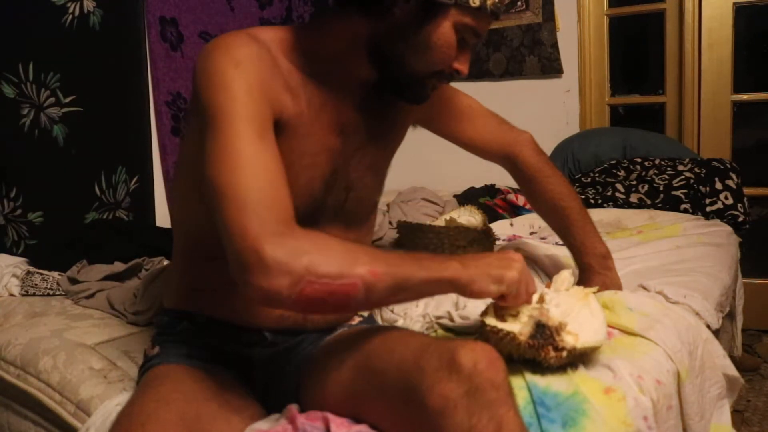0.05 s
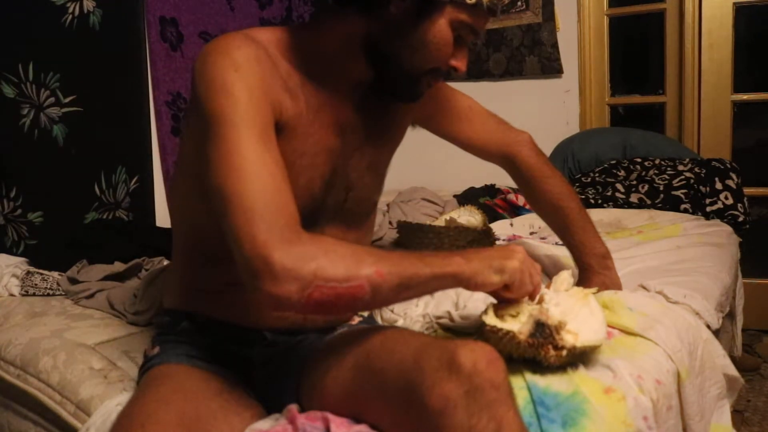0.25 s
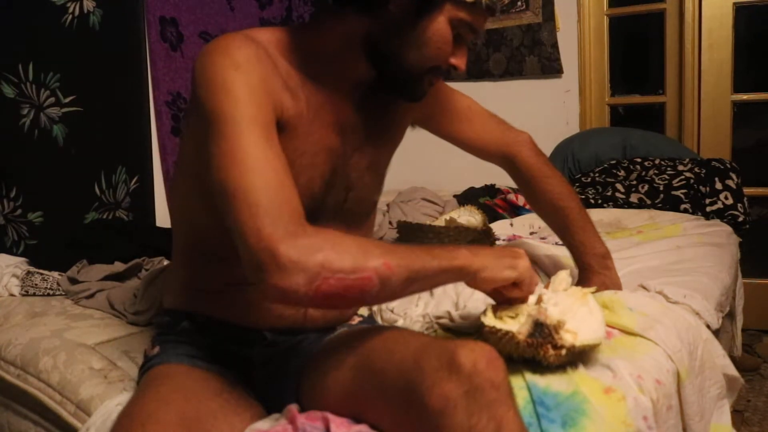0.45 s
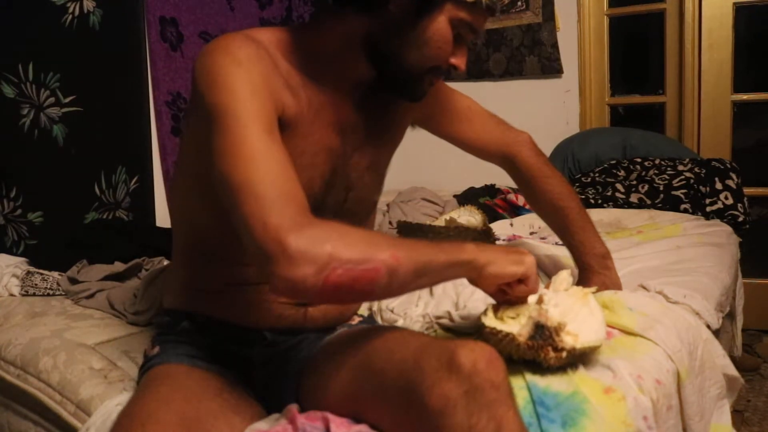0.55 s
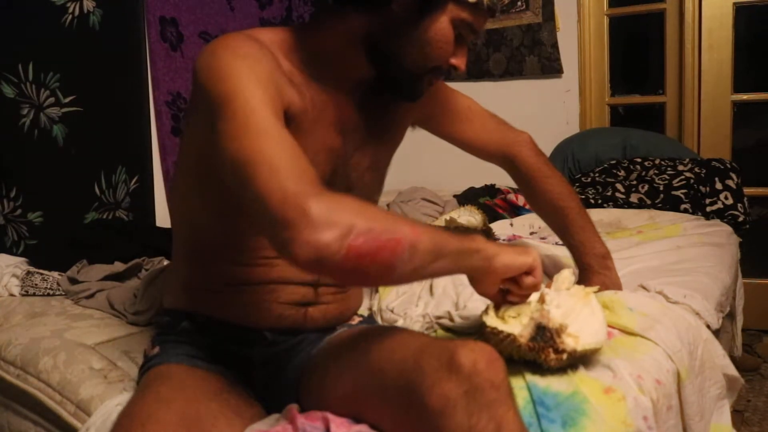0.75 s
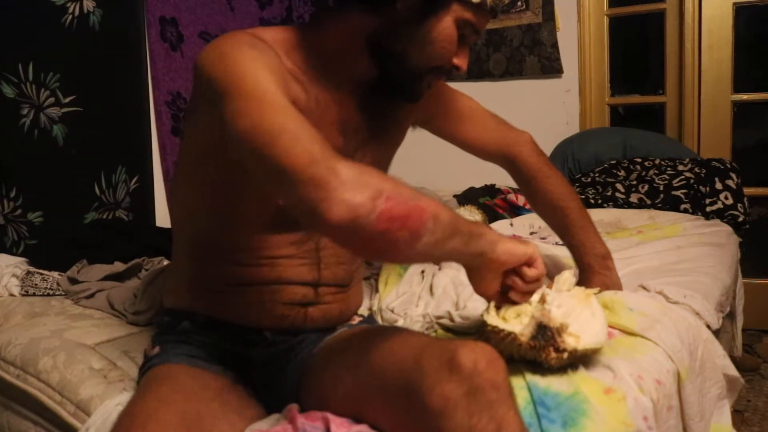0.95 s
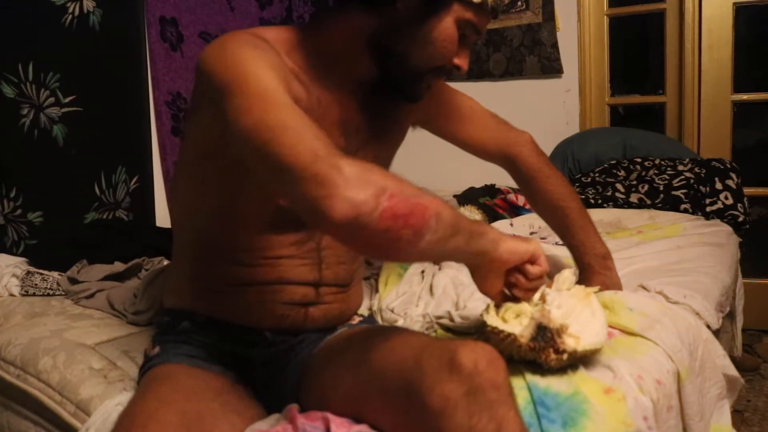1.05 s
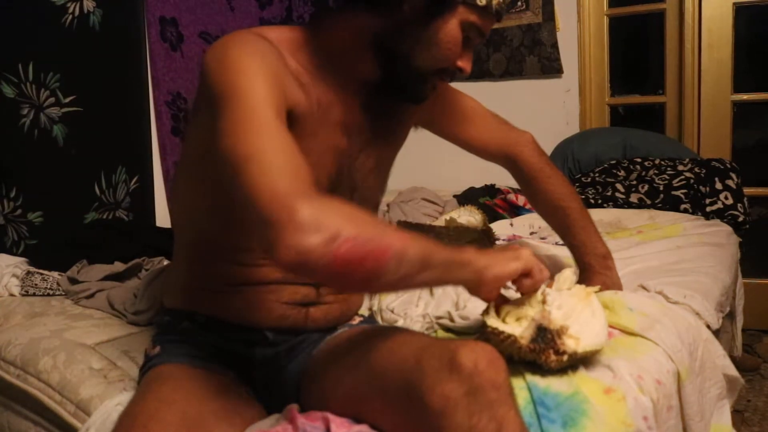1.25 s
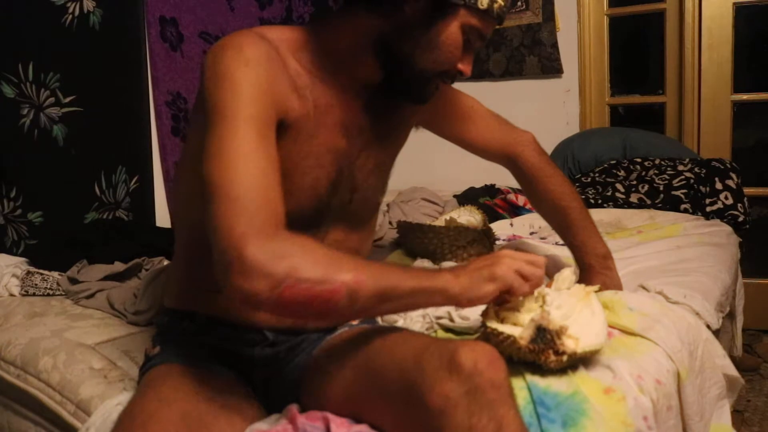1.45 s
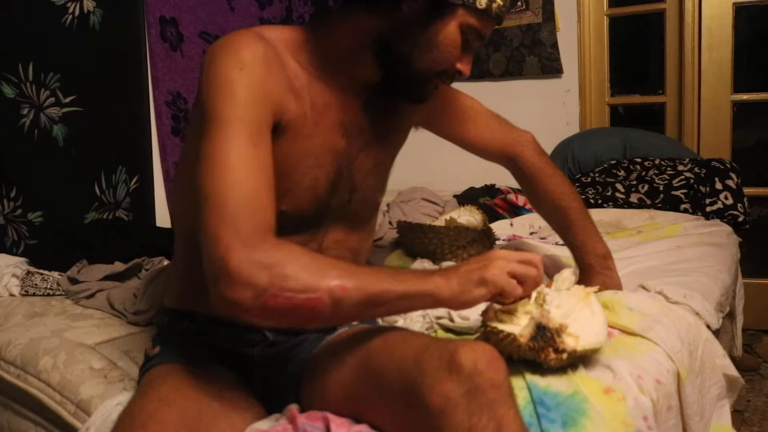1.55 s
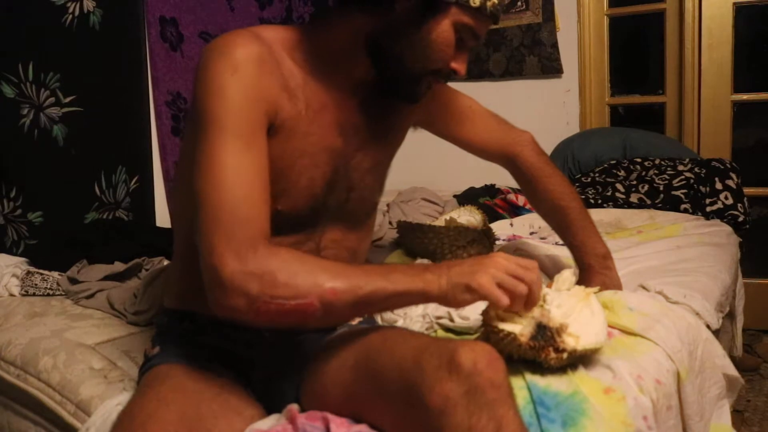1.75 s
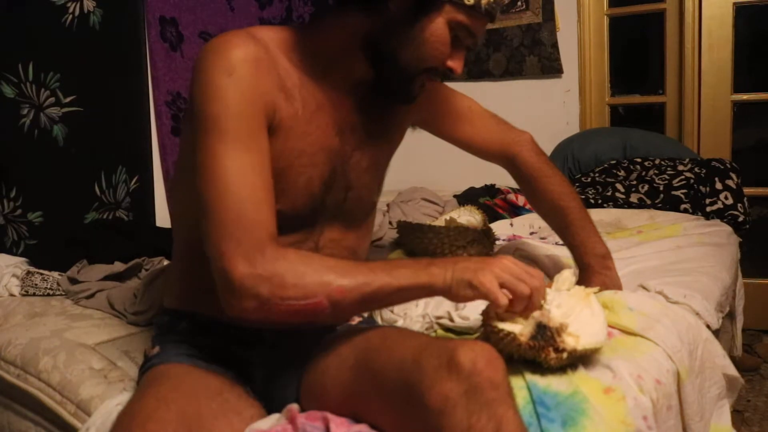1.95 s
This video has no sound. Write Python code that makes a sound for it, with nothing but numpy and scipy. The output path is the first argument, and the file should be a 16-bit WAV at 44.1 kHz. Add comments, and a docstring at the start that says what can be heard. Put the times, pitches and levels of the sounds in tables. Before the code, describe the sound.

Small frogs whistle repeatedly outside at night over steady crickets, with a few faint ticks.

```python
"""A garden at night, heard from inside a bedroom. From the start, over soft air noise, crickets trill
near 6 kHz under a high, raspy buzz, and distant coqui frogs blend into a reverberant chorus.
Nearer frogs open with a low, almost level "co"; rising "qui" whistles join at 0.2 s, each note smeared
by reflections from walls and trees. From 1.2 s on, fingers picking at a fruit snap its fibres
in a few faint ticks."""
import sys
import numpy as np
from scipy import signal
from scipy.fft import rfft, irfft
from scipy.io import wavfile

SR = 44100
rng = np.random.default_rng(int(sys.argv[2]) if len(sys.argv) > 2 else 0)


def bounce(signal):
    """Save signal as a 16-bit WAV file at the path given by the first command-line argument."""
    frames = np.transpose(np.atleast_2d(signal))
    limited = np.clip(frames, -1, 1)
    pcm = np.round(limited * 32767).astype(np.int16)
    wavfile.write(sys.argv[1], SR, pcm)


N = 88200
BAND_LIMIT_HZ = 14800


def amp(db):
    """The decibel scale: 20 dB is a factor of ten in amplitude."""
    return 10 ** (np.asarray(db) / 20)


def unit(x):
    """Normalisation to rms 1."""
    return x / np.sqrt(np.mean(x ** 2) + 1e-20)


def pan(db):
    """Constant-power panning: two gains, the left exceeding the right by db."""
    return unit(amp([[db / 2], [-db / 2]]))


def add(mix, start_s, sound):
    """Superposition: a stereo sound adds to the mix from start_s on."""
    part = mix[:, max(round(start_s * SR), 0):][:, :sound.shape[1]]
    part += sound[:, :part.shape[1]]


def colour(x, spectrum):
    """Spectral shaping: gains interpolated over log frequency, the result at rms 1."""
    points_hz, points_db = np.transpose(spectrum)
    hz = np.fft.rfftfreq(x.shape[-1], 1 / SR)
    gain_db = np.interp(np.log(hz + 1), np.log(points_hz), points_db, -100, -100)
    return unit(irfft(rfft(x) * amp(gain_db), x.shape[-1]))


def drift(rate_hz):
    """Low-pass noise: a smooth random fluctuation of rms 1."""
    hz = np.fft.rfftfreq(N, 1 / SR)
    return unit(irfft(rfft(rng.standard_normal(N)) * np.exp(-(hz / rate_hz) ** 2), N))


# Spectral density of night air and room tone: frequency_hz, relative_db
AIR_SPECTRUM = [(20, -15), (45, -7.5), (80, -2), (180, 0.5), (450, -0.5), (1000, -5), (2100, -6),
                (4300, -10), (7500, -13), (12000, -15.5), (15000, -28.5)]


def air(level_db=-53, shared_power=0.14):
    """A diffuse field: the noise at left and right is only weakly correlated."""
    left, right, shared = rng.standard_normal((3, N))
    noise = np.array([left, right]) + np.sqrt(shared_power) * shared
    return amp(level_db) * colour(noise, AIR_SPECTRUM)


# Spectral density of the massed crickets: frequency_hz, relative_db
CRICKET_SPECTRUM = [(5200, -27), (5550, -17), (5800, -6), (6020, -0.5), (6130, 1), (6270, -4.5),
                    (6420, -25), (6700, -53)]


def crickets(level_db=-50.5, pulse_hz=44, depth=0.35):
    """Amplitude modulation: trills merge into narrow-band noise, and the nearest throbs through."""
    phase = 2 * np.pi * np.cumsum(pulse_hz * (1 + 0.019 * drift(rate_hz=4.5))) / SR
    throb = np.exp(depth * (np.cos(phase) + 0.46 * np.cos(2 * phase)) / 2)
    trills = colour(rng.standard_normal((2, N)), CRICKET_SPECTRUM)
    return amp(level_db) * pan(db=-5.5) * unit(trills * throb)


# Spectral envelope of the high, raspy buzz: frequency_hz, relative_db
BUZZ_SPECTRUM = [(7500, -44), (8900, -18), (9800, -7), (10400, -2.5), (10950, -1), (11700, -10.5),
                 (12600, -14), (13600, -20), (14600, -30)]


def high_buzz(rate_hz=172.27, half_width_hz=7, decay_s=0.0011, rasp_db=-48.5, hiss_db=-52):
    """Roughness from fast modulation: a high, raspy buzz near 11 kHz, pulsing 172 times a second."""
    t, hz = np.arange(N) / SR, np.fft.rfftfreq(N, 1 / SR)
    harmonic = np.round(hz / rate_hz).astype(int)
    emphasis = amp(3.5 * (harmonic % 3 == 0))  # every third partial stands out
    comb = emphasis / np.hypot(1, (hz - harmonic * rate_hz) / half_width_hz)
    side_phasors = np.exp(2j * np.pi * rng.random((2, harmonic.max() + 1)))[:, harmonic]
    flutter_phasors = np.exp(2j * np.pi * rng.random(len(hz)))
    rasp = colour(irfft(comb * side_phasors * flutter_phasors, N), BUZZ_SPECTRUM)
    hiss = colour(rng.standard_normal((2, N)), BUZZ_SPECTRUM)
    throb = unit(1 + 0.63 * np.exp(-(t % (1 / rate_hz)) / decay_s))
    return (amp(rasp_db) * rasp + amp(hiss_db) * hiss) * throb


def echoes(x, echo_db, gap_s=0.0044, reflections_per_s=2000, garden_t60_s=0.57, left_lag_s=0.00011):
    """Reverberation: direct sound, quick wall reflections and a garden tail, at unchanged energy."""
    t = np.arange(SR) / SR
    reflections = rng.standard_normal((2, SR)) * (rng.random((2, SR)) < reflections_per_s / SR)
    wall_t60_s = max(0.25 + 0.0243 * echo_db, 0.05)  # the farther the frog, the longer its echoes
    decay = np.hypot(amp(-60 * t / wall_t60_s), amp(-20 - 60 * t / garden_t60_s))
    wet = signal.fftconvolve(x[None], reflections * (t > gap_s) * decay, axes=1)
    right = np.pad(x, (0, SR - 1))
    direct = np.array([np.roll(right, round(left_lag_s * SR)), right])
    out = direct + amp(echo_db) * wet * np.linalg.norm(x) / np.linalg.norm(wet, axis=1, keepdims=True)
    return out * np.linalg.norm(x) / np.linalg.norm(out, axis=1, keepdims=True)


def far_frogs(note, pitch_hz, level_db, notes_per_s):
    """Beyond the critical distance, echo outweighs direct sound and many calls blur into a chorus."""
    out = np.zeros((2, N + SR))  # the chorus is under way a second before the scene
    count = round(notes_per_s * (N / SR + 1))
    for k, (delay, detune) in enumerate(rng.random((count, 2))):
        call = note(pitch_hz * (1 + 0.12 * (detune - 0.5)))
        add(out, (k + delay) / notes_per_s, echoes(call, echo_db=13))
    return amp(level_db) * pan(db=-7) * unit(out[:, SR:])


def whistle_phase(hz, waver=0.0013):
    """Phase is the integral of frequency, which here wavers by a small random fraction."""
    return 2 * np.pi * np.cumsum(hz * (1 + waver * drift(rate_hz=100)[:len(hz)])) / SR


def gate(t, attack_s, release_s):
    """A raised-cosine envelope: soft attack, hold and soft release."""
    ramp = np.clip(np.minimum(t / attack_s, (t[-1] - t) / release_s), 0, 1)
    return np.sin(np.pi / 2 * ramp) ** 2


def co(length_s, pitch_hz, octave_db, sag_hz_per_s=290):
    """A nearly pure tone with a weak second harmonic, sagging slightly in pitch."""
    t = np.arange(0, length_s, 1 / SR)
    phase = whistle_phase(pitch_hz - sag_hz_per_s * (t - length_s / 2))
    tone = np.sin(phase) + amp(octave_db) * np.sin(2 * phase)
    return unit(gate(t, attack_s=0.0087, release_s=0.017) * tone)


# Low frog notes, and a short echo of one at 0.985 s:
# start_s, length_s, pitch_hz, level_db, pan_db, echo_db, octave_db
CO_TONES = [(0.0, 0.032, 1580, -48, 3, -3, -30), (0.041, 0.048, 1576, -44.5, -13, -4.5, -25),
            (0.136, 0.06, 1546, -47.5, -8, 14, -27), (0.191, 0.081, 1690, -35.5, -4.5, -1, -12.5),
            (.508, 0.089, 1516, -45.5, -6, 0.5, -30), (0.863, 0.094, 1554, -42.5, -8.5, -2, -23),
            (0.985, 0.036, 1555, -49.5, -1, -3, -30), (1.421, 0.086, 1519, -37.5, -9.5, -5, -36),
            (1.795, 0.047, 1528, -49.5, -1, -3, -30), (1.921, 0.075, 1603, -54, -15, 5, -30)]


def near_co_tones():
    """Multipath propagation: each low tone reaches the room by its own set of reflections."""
    out = np.zeros((2, N))
    for start_s, length_s, pitch_hz, level_db, pan_db, echo_db, octave_db in CO_TONES:
        tone = co(length_s, pitch_hz, octave_db)
        add(out, start_s, amp(level_db) * pan(pan_db) * echoes(tone, echo_db))
    return out


def qui(length_s, first_hz, top_hz, swell_db=6.5):
    """A frequency sweep: the whistle swells as it climbs and levels off at the top."""
    t = np.arange(0, length_s, 1 / SR)
    climb = 1 - np.abs(1 - t / length_s) ** 1.45
    tone = np.sin(whistle_phase(first_hz + (top_hz - first_hz) * climb))
    return unit(gate(t, attack_s=0.006, release_s=0.013) * amp(swell_db * climb) * tone)


# Rising notes of the near frogs: start_s, length_s, first_hz, top_hz, level_db, pan_db, echo_db
QUI_CALLS = [(0.191, 0.099, 2468, 3015, -39, -3, 13.5), (0.368, 0.085, 2360, 2870, -44.5, -7, 8.5),
             (0.418, .105, 2557, 3101, -21.5, -7.5, -1.5), (0.73, .1, 2280, 2800, -42, -5.5, 11.5),
             (0.874, 0.097, 2890, 3154, -59.5, -4.5, -5), (1.068, .1, 2438, 2916, -37, -3, 21),
             (1.482, 0.056, 2583, 2868, -49.5, -10, 19), (1.598, 0.09, 2605, 3036, -50, -6, 17),
             (1.637, .11, 2282, 2690, -37.5, -8.5, 3.5), (1.955, 0.084, 2506, 2895, -50, -10, 11)]


def near_qui_calls():
    """Interference: each rising note overlaps its own delayed reflections and is smeared."""
    out = np.zeros((2, N))
    for start_s, length_s, first_hz, top_hz, level_db, pan_db, echo_db in QUI_CALLS:
        call = qui(length_s, first_hz, top_hz)
        add(out, start_s, amp(level_db) * pan(pan_db) * echoes(call, echo_db))
    return out


# Fruit fibres snapping under the fingers: start_s, peak_db, pitch_hz, pan_db
FIBRE_SNAPS = [(1.23, -36, 3900, -5), (1.375, -42, 4800, -1), (1.439, -39, 4600, -2),
               (1.473, -42, 4280, -4), (1.507, -40, 3900, 2), (1.5274, -30, 4500, -5),
               (1.898, -40, 3500, 0)]


def fruit_ticks(decay_s=0.00036, half_width_octaves=0.52, room_t60_s=0.12):
    """Impulsive excitation: each fibre snaps in a burst of band noise that a small, soft room echoes."""
    direct, t = np.zeros((2, N)), np.arange(1024) / SR
    for start_s, peak_db, pitch_hz, pan_db in FIBRE_SNAPS:
        burst = rng.standard_normal(len(t)) * np.exp(-t / decay_s)
        edges_hz = [pitch_hz / 2 ** half_width_octaves, pitch_hz * 2 ** half_width_octaves]
        snap = signal.sosfilt(signal.butter(2, edges_hz, "band", fs=SR, output="sos"), burst)
        add(direct, start_s, amp(peak_db) * pan(pan_db) * snap / abs(snap).max())
    tail = rng.standard_normal((2, N)) * amp(-60 * np.arange(N) / SR / room_t60_s)
    return direct + signal.fftconvolve(direct, tail / np.linalg.norm(tail[0]), axes=1)[:, :N]


def scene():
    """Linear superposition: the steady background, then the near frogs, then the fruit."""
    background = air() + crickets() + high_buzz()
    far_co = far_frogs(lambda hz: co(0.071, hz, octave_db=-30), 1610, level_db=-61, notes_per_s=14)
    far_qui = far_frogs(lambda hz: qui(0.11, 0.84 * hz, hz), 2950, level_db=-60.5, notes_per_s=20)
    return background + far_co + far_qui + near_co_tones() + near_qui_calls() + fruit_ticks()


def record(dry):
    """Band limiting: a linear-phase low-pass filter removes the highest treble."""
    lowpass = signal.firwin(511, BAND_LIMIT_HZ, window=("kaiser", 9), fs=SR)
    return signal.oaconvolve(dry, lowpass[None], "same")


dry = scene()
out = record(dry)
bounce(out)
```